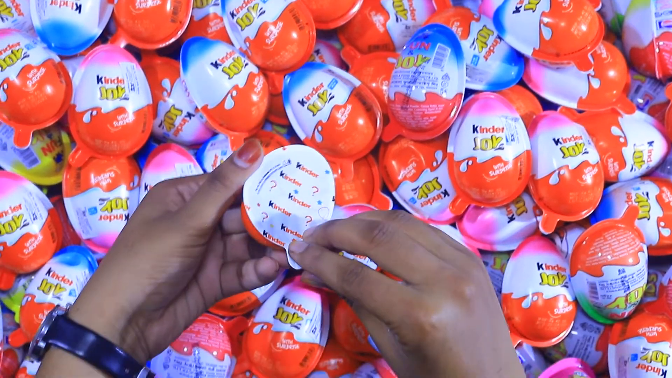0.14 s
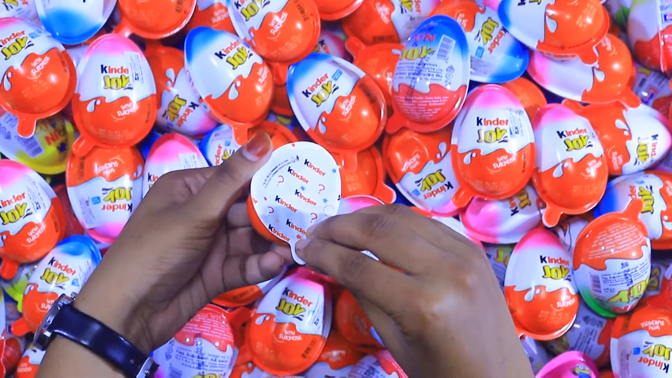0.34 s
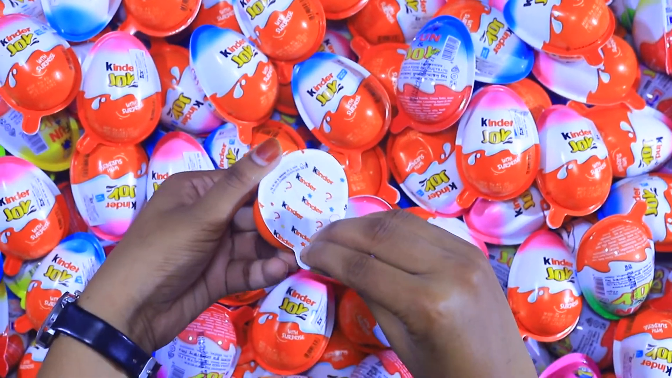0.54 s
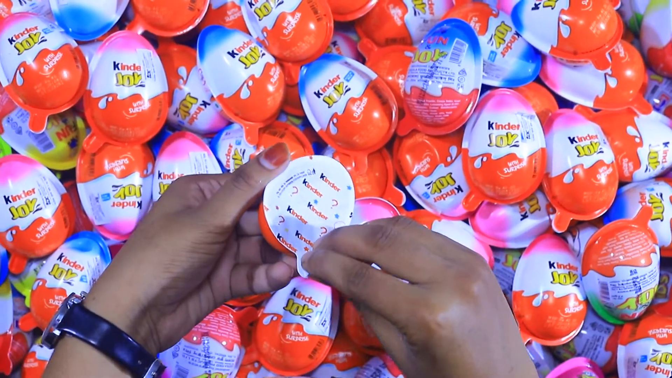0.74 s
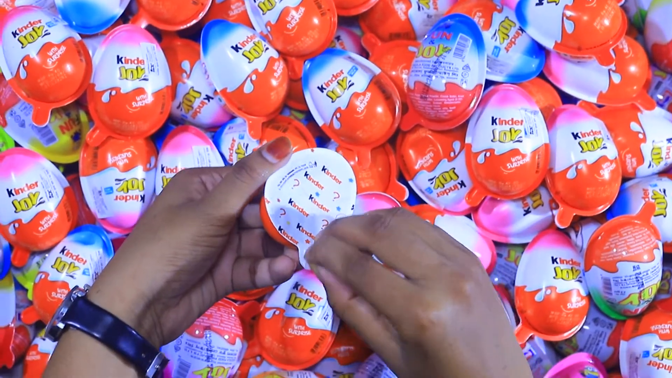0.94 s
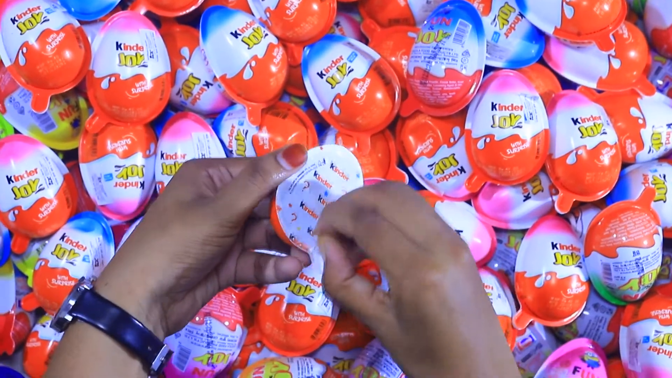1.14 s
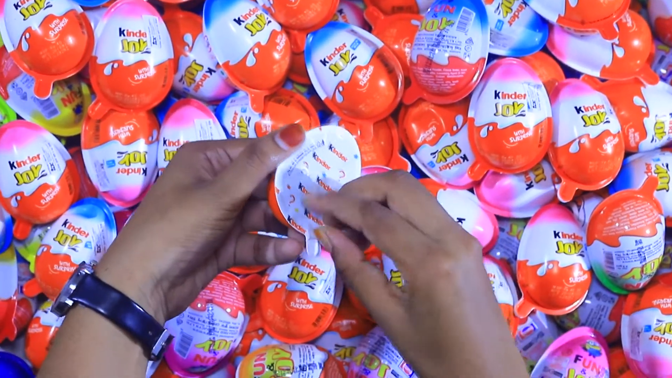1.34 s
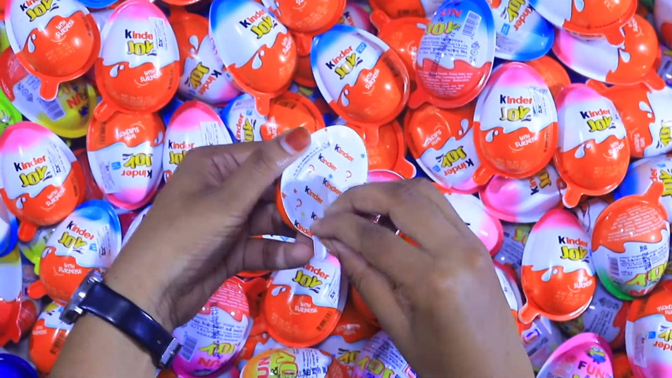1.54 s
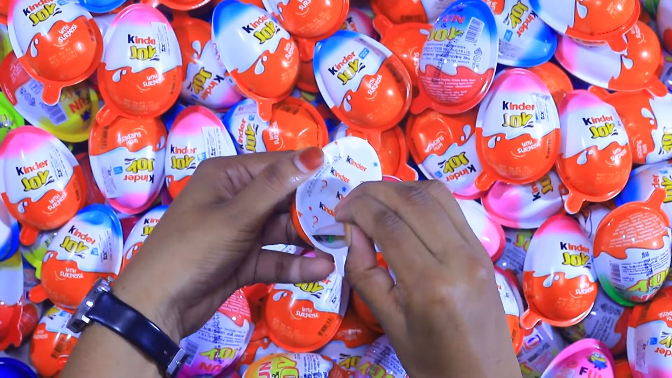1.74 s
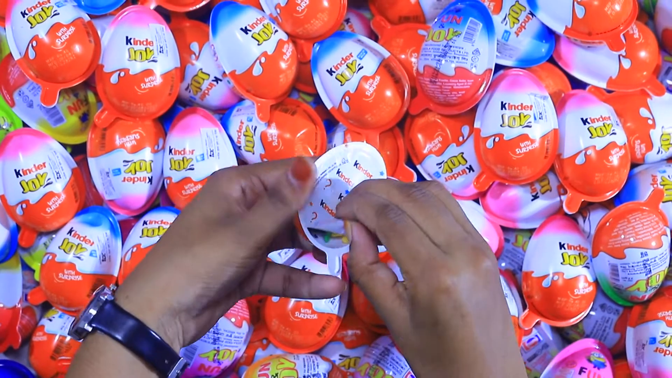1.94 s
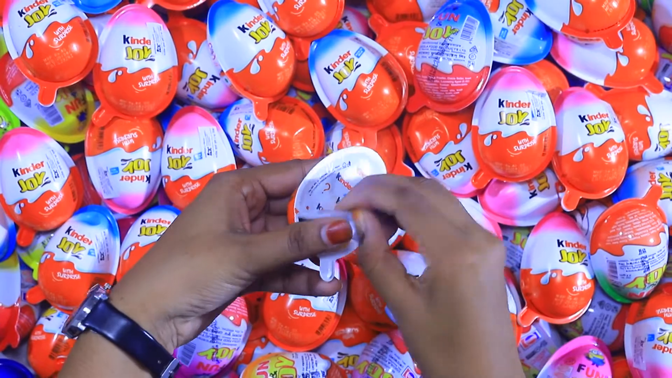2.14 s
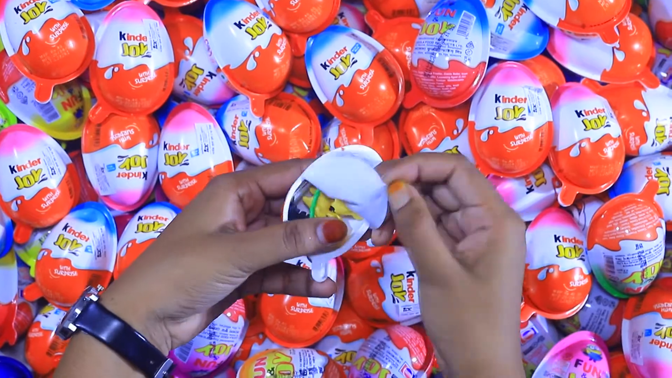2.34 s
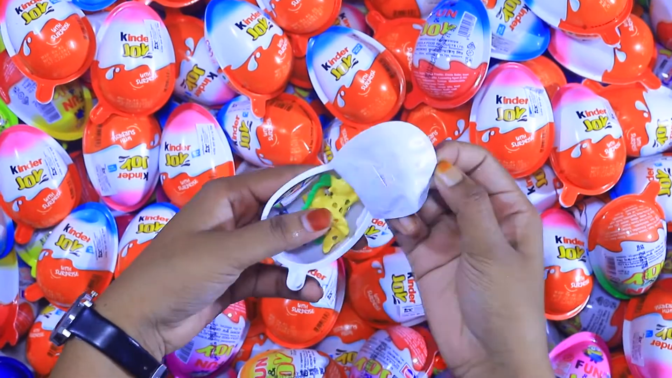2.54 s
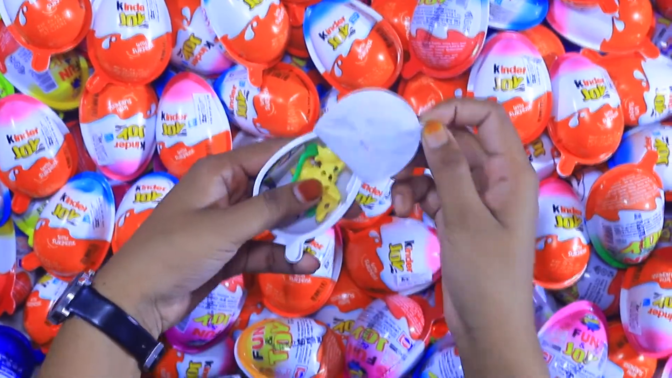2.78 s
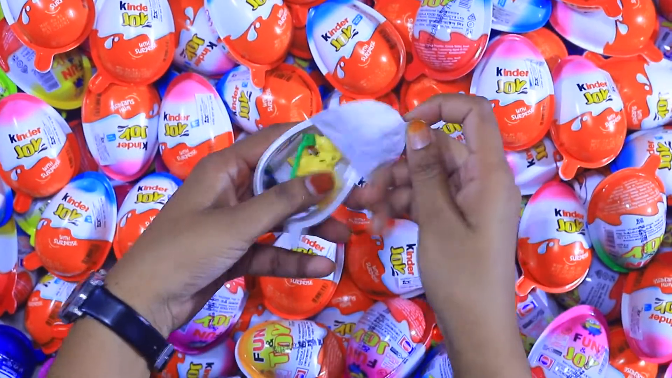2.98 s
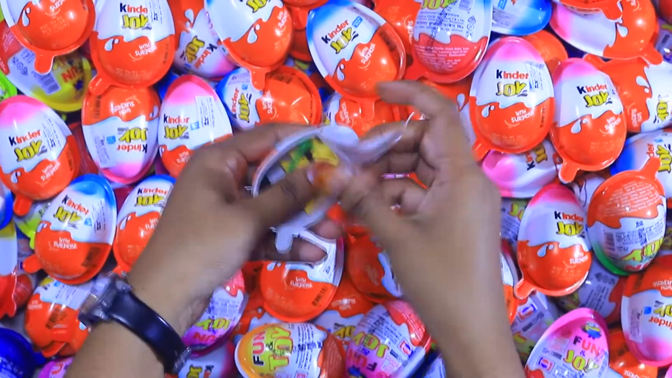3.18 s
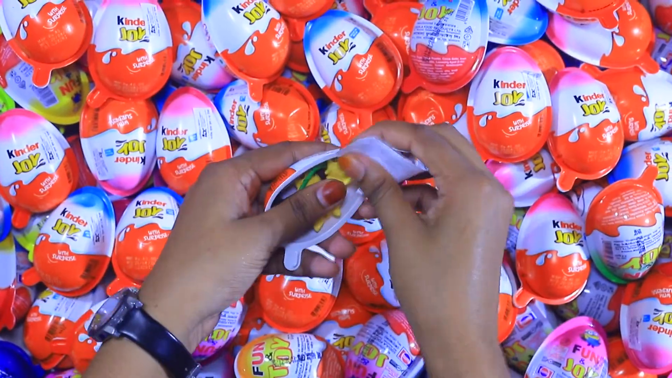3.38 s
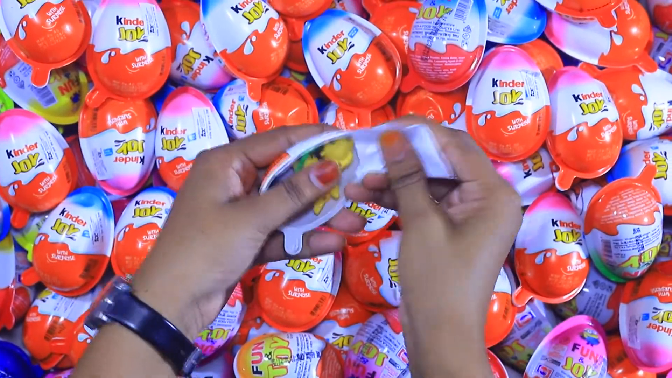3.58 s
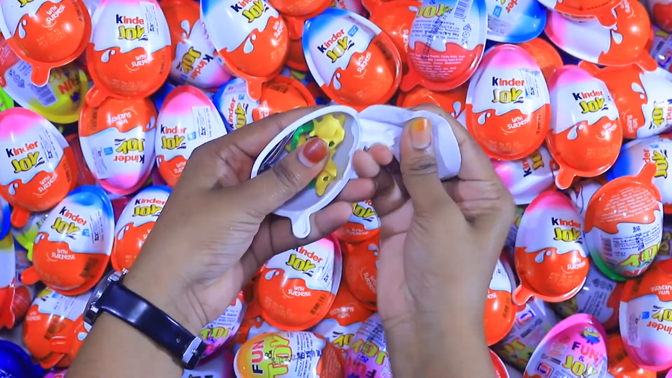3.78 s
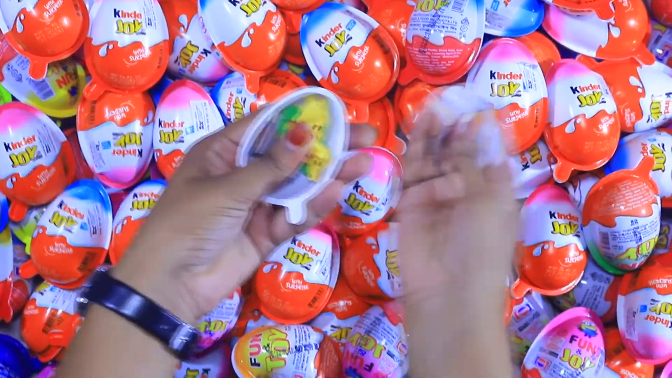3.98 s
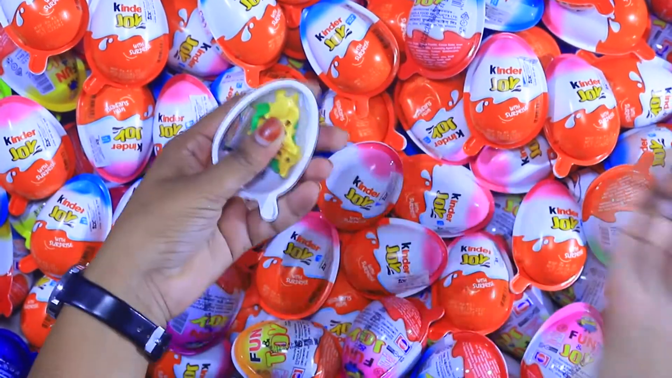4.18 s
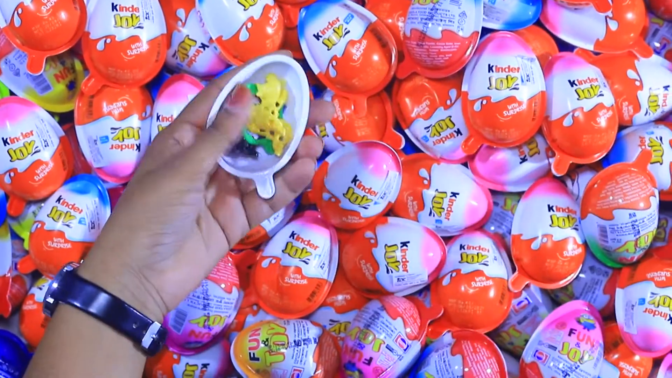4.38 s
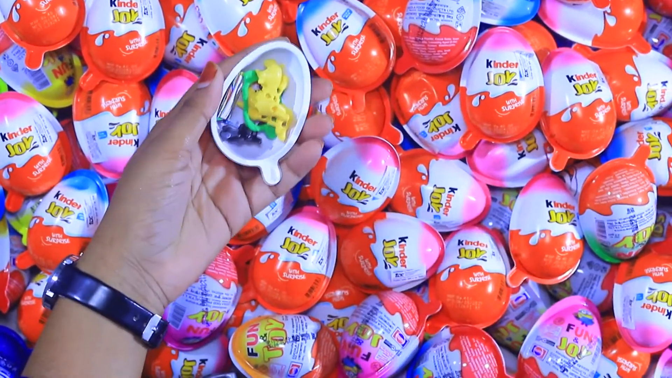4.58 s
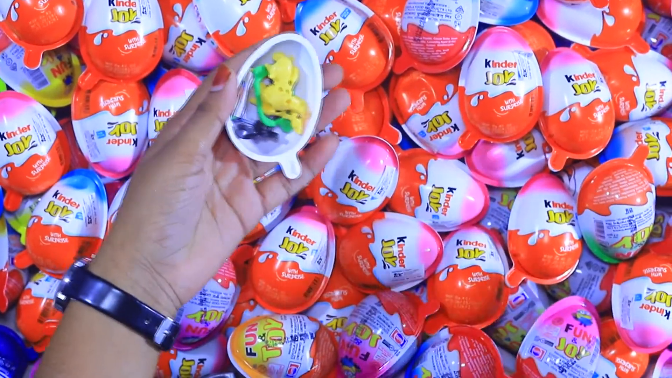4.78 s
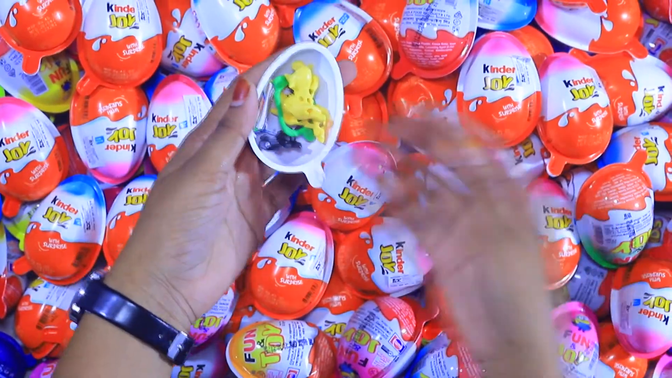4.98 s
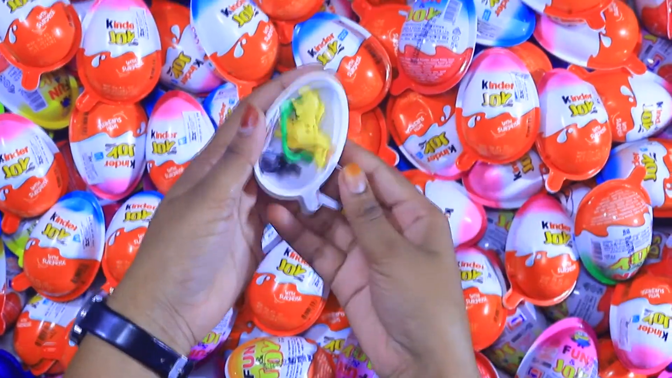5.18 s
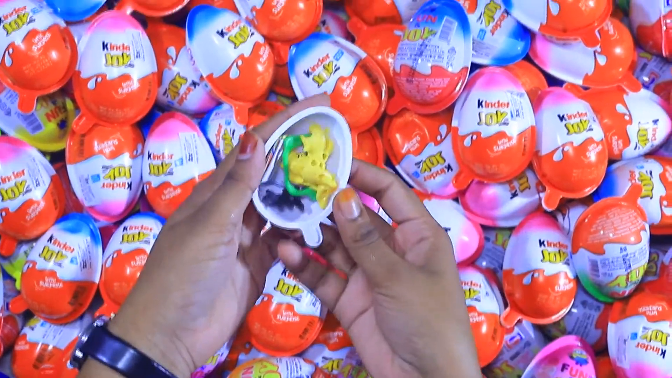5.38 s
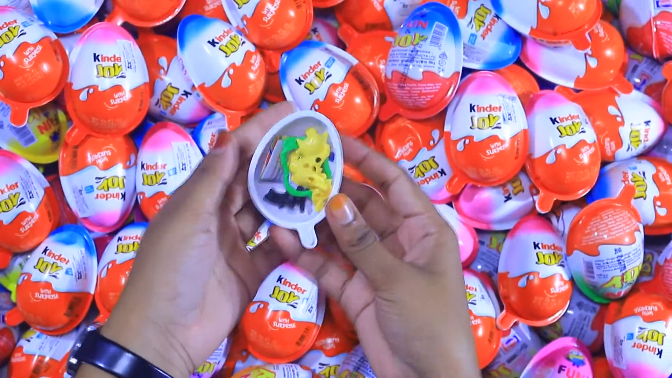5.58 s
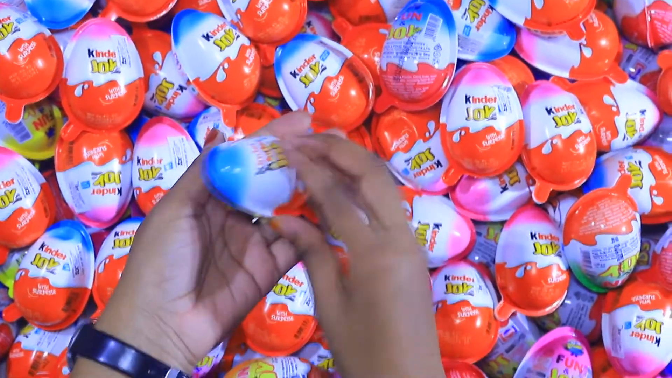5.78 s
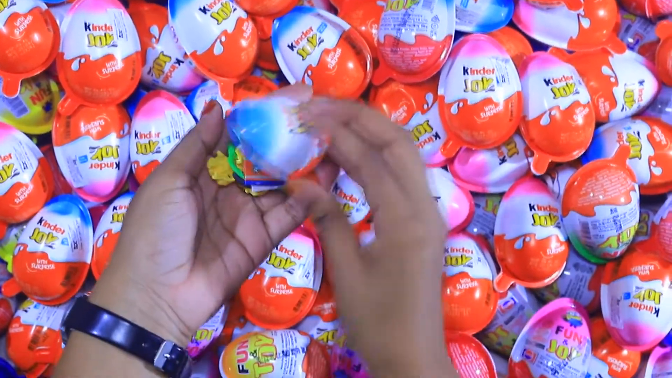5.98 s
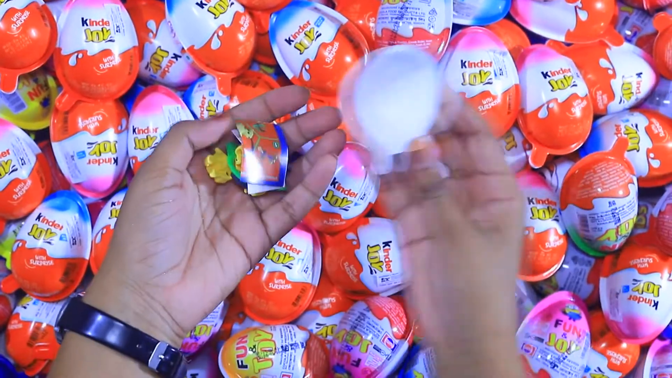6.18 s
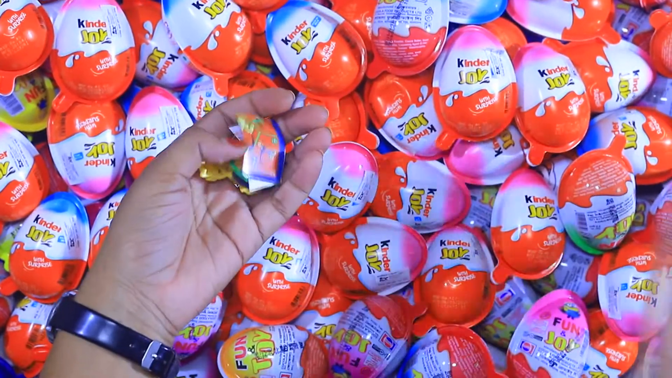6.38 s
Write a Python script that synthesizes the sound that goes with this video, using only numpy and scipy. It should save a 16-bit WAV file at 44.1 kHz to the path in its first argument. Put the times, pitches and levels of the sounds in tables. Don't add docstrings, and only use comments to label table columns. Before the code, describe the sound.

A stiff foil lid is peeled by hand from a hollow plastic half shell near a stereo microphone. Isolated crackles and dull finger bumps lead into a quick burst of bright snaps and rustling, then a few more crisp pops. It quiets to light plastic ticks and a double tap, with a lively small room, faint hiss and distant rumble behind.

```python
import sys
import numpy as np
from scipy import signal
from scipy.fft import rfft, irfft
from scipy.io import wavfile
from scipy.ndimage import uniform_filter1d

SR = 44100
rng = np.random.default_rng(int(sys.argv[2]) if len(sys.argv) > 2 else 0)


def master(y):
    cut = np.clip(np.atleast_2d(y).T, -1, 1)
    pcm = np.round(cut * 32767)
    wavfile.write(sys.argv[1], SR, pcm.astype(np.int16))


def invert_db(x):
    u = np.asarray(x, float) / 20
    return 10 ** u


N = 283646

# frequency in Hz, level in dB per Hz.
BACKGROUND_SPECTRUM = [(15, -45.5), (30, -20.5), (50, -10), (200, -8.5), (460, -11), (939, -17.5),
                       (5910, -26), (13000, -38)]


def evened(x):
    return x / np.sqrt(np.mean(x ** 2) + 1e-20)


def read(points, hz):
    f, value = np.transpose(points)
    return np.interp(np.log(hz + 1), np.log(f + 1), value)


def add(mix, s, sound):
    part = mix[round(s * SR):][:len(sound)]
    part += sound[:len(part)]


def ring(db, hz, t60, count=1200):
    t = np.arange(count) / SR
    return invert_db(db - 60 * t / max(t60, 1e-3)) * np.sin(2 * np.pi * hz * t)


def band(x, low_hz, high_hz):
    return signal.sosfilt(signal.butter(2, [low_hz, high_hz], "band", fs=SR, output="sos"), x)


def rumble():
    # frequency in Hz, width in Hz, level in dB.
    room_modes = [(54, 5, -4), (84, 3.7, 0.5), (99, 5.15, -3.5), (120, 7.3, 0), (135, 6.6, -6.5),
                  (160, 5, 4), (183.4, 5.44, -1), (205.2, 7.5, 1)]
    # time in seconds, level in dB.
    swells = [(0, -69.5), (1.0, -70), (1.6, -66.5), (1.84, -71), (2.24, -63), (2.63, -67), (3.01, -61.5),
              (3.5, -68), (4.2, -69.5), (4.62, -65), (5.28, -73), (6.3, -69.5)]
    # start in seconds, length in seconds, frequency in Hz, level in dB.
    drones = [(0.37, 0.86, 120, -69.5), (.9, 0.9, 99, -71.5), (2.944, 0.27, 160, -75),
              (4.405, 0.65, 54, -72), (4.507, 0.3, 84, -69), (1.7, .45, 54, -75)]
    hz, t = np.fft.rfftfreq(N, 1 / SR), np.arange(N) / SR
    a, b, c, d = rng.standard_normal((len(hz), 4)).T
    modes = invert_db(-6.5) + sum(invert_db(db) / (1 + (2 * (hz - f) / width) ** 2) for f, width, db in room_modes)
    left = a + 1j * b
    right = 0.79 * left + 0.63 * (c + 1j * d)
    z = np.array([left, right]) * modes * invert_db(read(BACKGROUND_SPECTRUM, hz))
    swell_s, swell_db = np.transpose(swells)
    out = evened(irfft(z * (hz < 90), N)) * invert_db(-73)
    out += evened(irfft(z * (hz >= 90) * (hz < 240), N)) * invert_db(np.interp(t, swell_s, swell_db))
    for start, length, f, db in drones:
        swell = np.sin(np.pi * np.clip((t - start) / length, 0, 1)) ** .5
        out += invert_db(db + 3.5) * np.sin(2 * np.pi * f * t) * swell
    return out * invert_db(np.array([[1.2], [-1.2]]))


def air():
    # frequency in Hz, likeness from -1 to 1.
    likeness = [(60, 0.22), (180, 0.63), (530, 0.17), (1590, 0.12), (4750, 0.04), (14200, 0.099)]
    # frequency in Hz, level in dB rms.
    whine_tones = [(6150, -94)]
    frames, hz = N // 512 + 5, np.fft.rfftfreq(2048, 1 / SR)
    a, b, c, d, patches = rng.standard_normal((frames, 1025, 5)).T
    patches = evened(uniform_filter1d(uniform_filter1d(patches, 5, 0), 6, 1))
    same = np.clip(read(likeness, hz), -1, 1)[:, None]
    left = a + 1j * b
    right = same * left + np.sqrt(1 - same ** 2) * (c + 1j * d)
    passed = (hz >= 240) / (1 + (hz / 13200) ** 40)
    z = np.array([left, right]) * invert_db(read(BACKGROUND_SPECTRUM, hz)[:, None] + 2.4 * patches)
    z *= passed[:, None]
    hiss = invert_db(-66.5) * evened(signal.istft(z, nperseg=2048, noverlap=1536)[1][:, :N])
    t = np.arange(N) / SR
    whine = sum(invert_db(db + 2) * np.sin(2 * np.pi * f * t) for f, db in whine_tones)
    return hiss * invert_db(np.array([[.6], [-.6]])) + whine


def thumps():
    # time in seconds, level in dB, frequency in Hz, ring in seconds.
    knocks = [
        (1.5505, -41, 440, .03),
        (1.557, -44, 122, .07),
        (5.072, -52, 207, .04),
        (5.154, -46, 257, .04),
        (5.2, -50, 242, .04),
    ]
    out = np.zeros(N)
    for s, db, hz, t60 in knocks:
        add(out, s, ring(db, hz, t60, count=4000))
    return out


def rustle():
    # start in seconds, length in seconds, level in dB, centre in Hz.
    slides = [(0.167, 0.091, -70.5, 1550), (1.54, 0.11, -61, 2740), (2.199, 0.15, -51.5, 1530),
              (2.41, 0.17, -52, 3500), (2.856, 0.25, -71.5, 2120), (3.025, 0.3, -71.5, 3670),
              (3.333, 0.32, -68, 3480), (3.676, 0.066, -54.5, 2700), (4.422, 0.22, -73, 3470),
              (4.605, 0.19, -71.5, 2940), (5.271, 0.069, -72, 2980), (5.73, 0.14, -74.5, 2500)]
    out = np.zeros(N)
    for s, length, db, hz in slides:
        hit, size, sign = rng.random((20000, 3)).T[:, :round(length * SR)]
        height = invert_db(-4.5 * np.log(size + 0.0021))
        creases = (hit < 1500 / SR) * height * np.sign(sign - .5)
        sound = evened(band(creases, 0.64 * hz, 1.76 * hz))
        add(out, s, invert_db(db) * sound * signal.windows.tukey(len(hit), .6))
    return out


def bumps():
    # time in seconds, level in dB, frequency in Hz, ring in seconds.
    finger_bumps = [
        (0.891, -55.5, 515, 0.05),
        (1.181, -50, 780, 0.055),
        (1.667, -52, 750, 0.047),
        (1.761, -54, 850, 0.038),
        (3.688, -50.5, 800, 0.022),
    ]
    out = np.zeros(N)
    for s, db, hz, t60 in finger_bumps:
        add(out, s, ring(db, hz, t60, count=4000))
    return out


def pings_and_ticks():
    # time in seconds, level in dB, frequency in Hz, ring in seconds.
    pings = [
        (0.5926, -38.5, 7170, 0.014),
        (0.8579, -52, 7100, 0.018),
        (0.8939, -40.5, 4950, 0.031),
        (2.575, -6, 2990, 0.0073),
        (3.1712, -38, 4650, 0.012),
        (4.2296, -22, 3720, 0.01),
        (4.6498, -44, 2820, 0.02),
        (4.7212, -46, 2820, 0.042),
    ]
    ticks = [
        (1.1797, -40, 4200, .006),
        (1.0775, -34, 1140, 0.014),
        (1.7583, -29.5, 1190, 0.011),
        (2.5752, -11.5, 4040, .0012),
        (3.9875, -34, 2500, .006),
        (4.332, -43, 1260, 0.008),
        (4.329, -40, 2700, 0.009),
        (5.8447, -47.5, 1660, .008),
        (5.853, -47.5, 1750, 0.011),
    ]
    out = np.zeros(N)
    for s, db, hz, t60 in pings:
        add(out, s + 0.001212, ring(db - 9.5, hz, t60, count=2000))
    for s, db, hz, t60 in ticks:
        add(out, s + .0006, ring(db - 1, hz, t60))
    return out


def hollow():
    # time in seconds, level in dB, frequency in Hz, ring in seconds.
    swings = [
        (2.1385, -23, 3150, .006),
        (3.5921, -16, 2750, .006),
        (3.9893, -16, 2400, .007),
    ]
    out = np.zeros(N)
    for s, db, hz, t60 in swings:
        add(out, s, band(ring(db, hz, t60), .8 * hz, 1.35 * hz))
    return out


def toy_taps():
    # time in seconds, level in dB.
    taps = [
        (5.8741, -43.5),
        (5.8842, -39),
    ]
    # frequency in Hz, level in dB, t60 in seconds.
    toy_modes = [(1970, -12, .004), (3070, -4.5, 0.014), (3600, 1, 0.0036), (4300, 1.5, 0.012),
                 (5240, 0, 0.0026), (6150, -4.5, 0.011), (7240, -0.5, 0.0038), (8550, -5, .003),
                 (9500, -3, 0.0034), (10070, -0.5, 0.01), (11400, -7, .007), (13500, -17.5, .005)]
    out = np.zeros(N)
    struck = band(sum(ring(db, hz, t60) for hz, db, t60 in toy_modes), 2600, 19000)
    for s, db in taps:
        add(out, s, invert_db(db) * struck)
    return out


def shell():
    return bumps() + band(pings_and_ticks() + hollow() + toy_taps(), 420, 22000)


def crack_shape():
    # frequency in Hz, level in dB.
    crack_spectrum = [(300, -65), (1000, -7), (2500, -15.5), (5000, 7), (8000, 4.5), (11000, -3.5),
                      (13500, -8), (15500, -20)]
    log_gain = np.log(invert_db(read(crack_spectrum, abs(np.fft.fftfreq(2048, 1 / SR)))))
    pulse = np.fft.ifft(np.exp(log_gain - 1j * signal.hilbert(log_gain).imag)).real[:600]
    return pulse / abs(pulse).max()


def snap_rows():
    # time in seconds, shell ring in dB, shell ring in Hz,
    # foil ring in Hz, foil ring in dB.
    glue_tears = [(0.856, -65, 860, 7010, -65), (1.077, -28.5, 2330, 3760, -27),
                  (1.182, -47, 850, 3200, -33), (1.45, -42.5, 1920, 3580, -39),
                  (1.76, -21.5, 2660, 4330, -14), (2.138, -31, 3190, 3500, -30),
                  (2.2903, -36, 1740, 3200, -34), (2.372, -30, 1190, 3220, -33.5),
                  (2.4195, -30, 2212, 3900, -24), (2.4238, -24, 2240, 3970, -13),
                  (2.557, -33, 1220, 3500, -27), (3.372, -42, 3050, 4760, -32),
                  (3.5914, -32, 3300, 3750, -17), (3.749, -45, 2550, 3600, -32.5),
                  (3.859, -38, 3050, 3300, -37.5), (3.907, -64.5, 810, 3730, -44),
                  (3.952, -65, 2700, 5040, -43), (3.9893, -31, 2300, 3900, -14.5),
                  (4.2295, -50, 3700, 7800, -32), (4.598, -48.5, 2430, 4090, -58),
                  (4.621, -62, 1150, 4800, -50), (5.996, -57, 3070, 4330, -60)]
    folds = [(0.592, -50, 2080, 6840, -41), (1.099, -32.5, 1750, 3300, -35), (1.351, -64, 840, 6300, -38),
             (1.613, -44, 2580, 3790, -40), (2.2008, -29.5, 1390, 3400, -28),
             (2.2077, -45, 2000, 3450, -28), (2.23, -36, 2300, 4600, -31), (2.268, -31, 1760, 3620, -27),
             (2.3153, -47.5, 1750, 3380, -25), (2.33, -37.5, 2600, 3200, -25),
             (2.416, -31.5, 1747, 4100, -18), (2.4924, -25, 2330, 3600, -18),
             (2.575, -15.5, 2840, 4460, -7.5), (2.914, -47, 1110, 3580, -40),
             (3.055, -41.5, 2440, 4200, -36.5), (3.17, -41.5, 2330, 4670, -40.5),
             (3.368, -39, 2400, 3100, -44), (3.693, -35.5, 2680, 3420, -34), (4.3225, -46, 1050, 2800, -36),
             (4.471, -53, 2800, 4400, -47), (4.65, -59, 2870, 4860, -52), (5.093, -70, 635, 3380, -54)]
    # time in seconds, shell ring in dB,
    # shell ring in Hz, foil ring below it in dB.
    shell_dents = [(0.169, -59, 1530, 8), (0.646, -45, 1660, 8), (0.894, -41, 2840, 5),
                   (1.094, -35, 1690, 13), (1.53, -38.5, 1410, 6), (1.627, -50, 1440, 21),
                   (1.705, -44, 2350, 25), (1.755, -34, 1600, 12), (2.48, -33, 2900, 2),
                   (2.5205, -26, 2460, 8), (2.5312, -27, 2600, 1), (2.5503, -22, 2400, 8),
                   (2.715, -29, 2900, 28), (2.893, -55.5, 840, 1), (3.114, -53, 1330, 12),
                   (3.354, -40, 2880, 24), (3.424, -41.5, 2400, 10), (3.512, -36.5, 2500, 10),
                   (4.309, -45, 2660, 27), (4.509, -52, 2200, 13), (4.549, -49, 2366, 16.5),
                   (4.72, -57, 2910, 3.5), (5.276, -44, 2190, 5.5), (5.323, -51, 2980, 30),
                   (5.387, -65, 725, 1.5), (5.739, -58, 1300, 15), (5.786, -63, 1420, 14)]
    held_foil_hz = 3900
    tears = [(*row, row[-1] - 4) for row in glue_tears]
    creases = [(*row, row[-1] - 24) for row in folds]
    dents = [(s, db, hz, held_foil_hz, db - below_db, db - 25.5) for s, db, hz, below_db in shell_dents]
    return sorted(tears + creases + dents)


def snaps(ring_db):
    rows = snap_rows()
    out, pulse = np.zeros(N), crack_shape()
    chance = rng.random((len(rows), 9, 3)).transpose(0, 2, 1)
    for (s, low_db, low_hz, high_hz, high_db, crack_db), (place, delay, size) in zip(rows, chance):
        snap = ring(low_db + ring_db, low_hz, 15 / low_hz)
        snap = snap + ring(high_db + ring_db - 4.5, high_hz, 17 / high_hz)
        snap = band(snap, 100, min(2.4 * high_hz, 19000))
        add(snap, 0, invert_db(crack_db - 0.5) * pulse)
        along = (np.arange(len(place)) + place) / len(place)
        spread_hz = .5 * low_hz * (3.03 * high_hz / low_hz) ** along
        outline = [(1.1 * low_hz, low_db - 11), (low_hz, low_db), (high_hz, high_db),
                   (1.8 * high_hz, high_db - 5.0)]
        spread_db = read(outline, spread_hz)
        for hz, db, late, small in zip(spread_hz, spread_db, delay, size):
            add(snap, 0.00026 * late, ring(db - 3.5 - 4 * small, hz, 12 / hz, count=500))
        for late, small in zip(delay[:4], size):
            add(snap, .0016 * late, invert_db(crack_db - 2 - 12 * small) * pulse)
        add(out, s + .0008, band(snap, 0.58 * low_hz, 17000))
    return band(out, 220, 19000)


def room(directions):
    # delay in seconds, level in dB.
    echoes = [(.0022, -10.5), (.0075, -9.5), (0.0125, -14), (0.0218, -14.5), (.0285, -17.5)]
    # frequency in Hz, t60 in seconds.
    decay = [(250, 0.56), (700, 0.75), (1800, 0.65), (4500, .5), (8000, 0.48), (13000, 0.37)]
    # frequency in Hz, level in dB.
    tail_colour = [(300, -3), (1200, -1), (3000, -3.5), (6000, -2), (9000, 0), (13300, -6), (14100, -30)]
    # frequency in Hz, factor.
    shared_part = [(300, 2.36), (1000, 0.43), (3000, 0.26), (10000, 0.35)]
    out = np.zeros((2, N))
    slots = np.arange(100, SR - 20, 12)
    for x in directions:
        taps = np.zeros((3, SR))
        at = slots + rng.integers(0, 12, (3, len(slots)))
        np.put_along_axis(taps, at, rng.choice([-1., 1.], at.shape), 1)
        hz, t, z = signal.stft(taps, SR, nperseg=256)
        z = z[:2] + read(shared_part, hz)[:, None] * z[2]
        fall_db = read(tail_colour, hz)[:, None] - 60 * t / read(decay, hz)[:, None]
        tail = signal.istft(z * invert_db(fall_db), SR, nperseg=256)[1]
        tail *= np.clip(np.arange(tail.shape[1]) / SR / 0.0061, 0, 1)
        tail *= invert_db(-0.5) / np.linalg.norm(tail, axis=1, keepdims=True)
        for delay, db in echoes:
            tail[[0, 1], round(delay * SR) + rng.integers(-9, 10, 2)] += invert_db(db - 2.0)
        out += signal.fftconvolve(x[None], tail, axes=1)[:, :N]
    return out / np.sqrt(len(directions))


def scene():
    steady = shell() + rustle()
    hands = steady + snaps(-0.12)
    hz = np.fft.rfftfreq(N, 1 / SR)
    shade = invert_db(read([(700, 0.85), (2500, -1.2)], hz)) ** np.array([[1], [-1]])
    later = np.exp(-2j * np.pi * hz * np.array([[27e-6], [0]]))
    walls = room([steady + snaps(-0.6) for direction in range(3)])
    return irfft((rfft(hands) * later + rfft(walls)) * shade, N) + air() + rumble() + thumps()


def low_pass(x):
    return signal.sosfilt(signal.butter(12, 14770, fs=SR, output="sos"), x)


def record(dry):
    rolled = signal.sosfilt(signal.butter(6, 14000, fs=SR, output="sos"), dry)
    return low_pass(rolled)


dry = scene()
out = record(dry)
master(out)
```